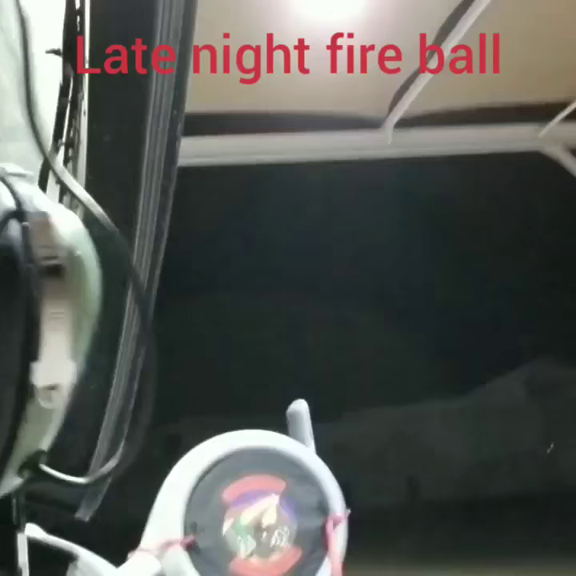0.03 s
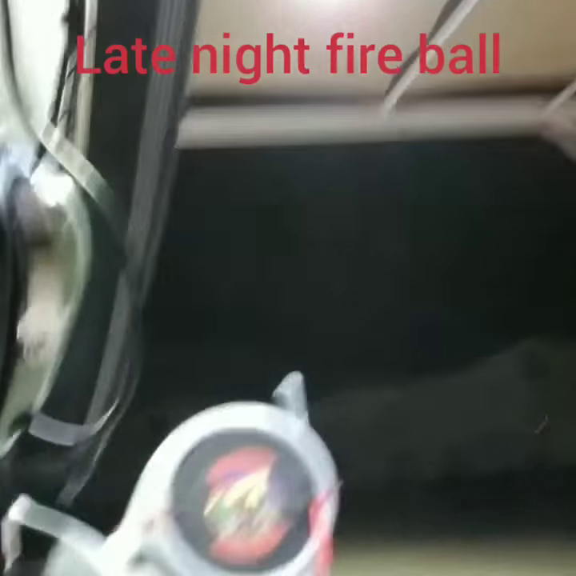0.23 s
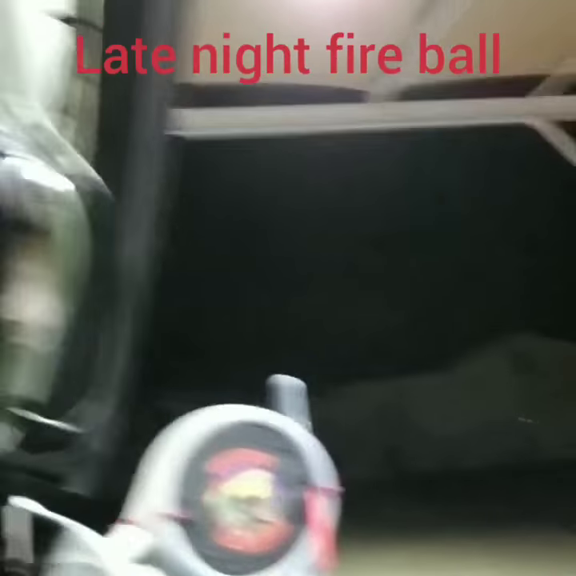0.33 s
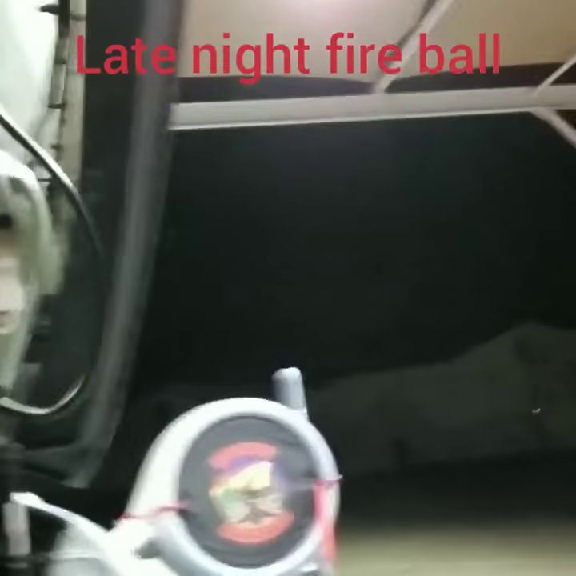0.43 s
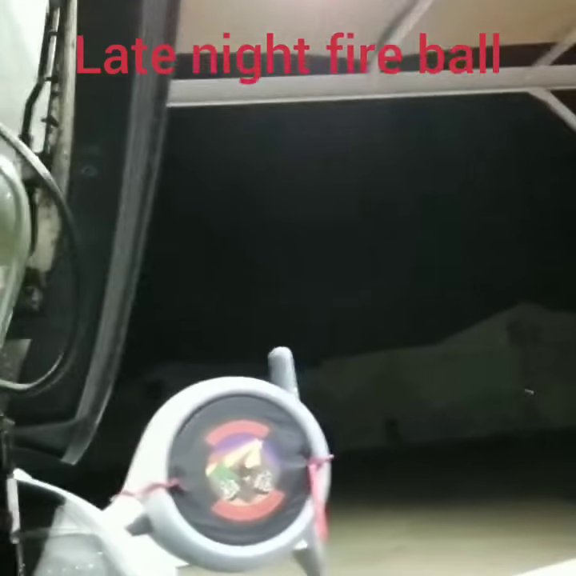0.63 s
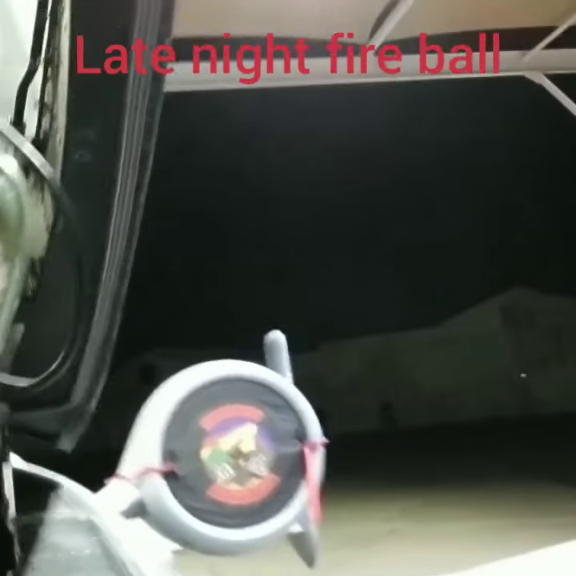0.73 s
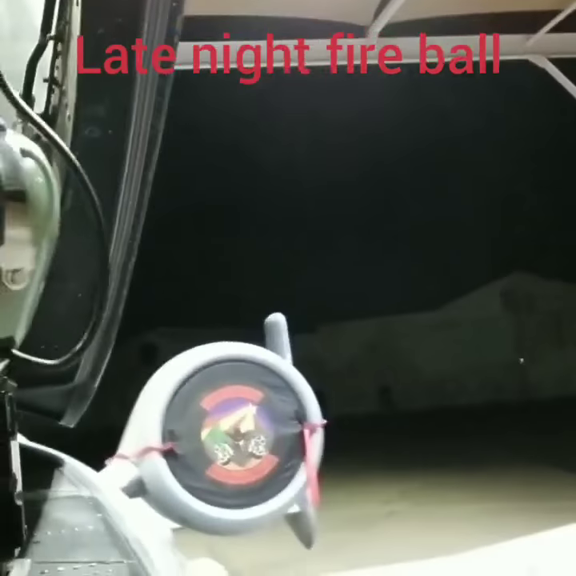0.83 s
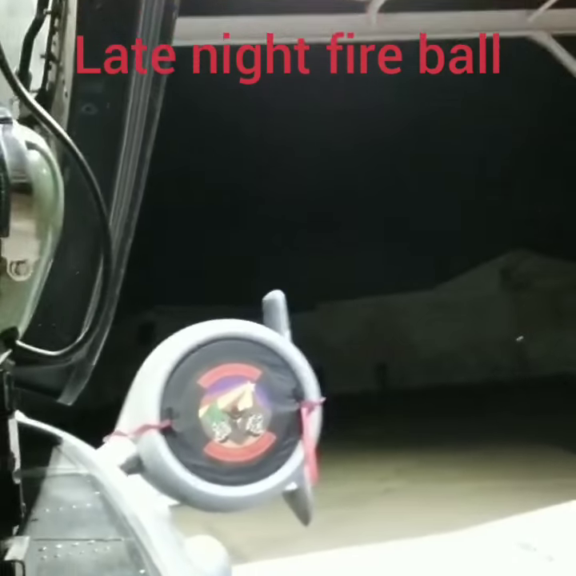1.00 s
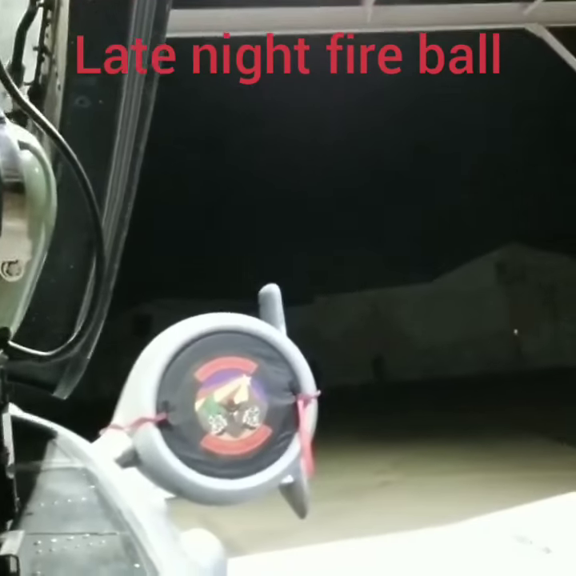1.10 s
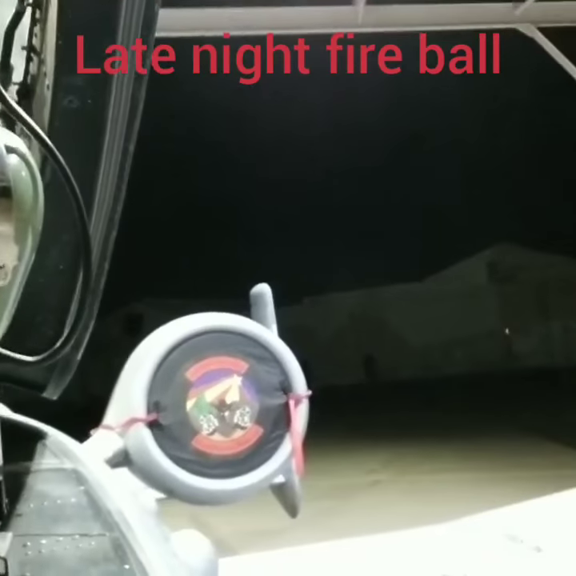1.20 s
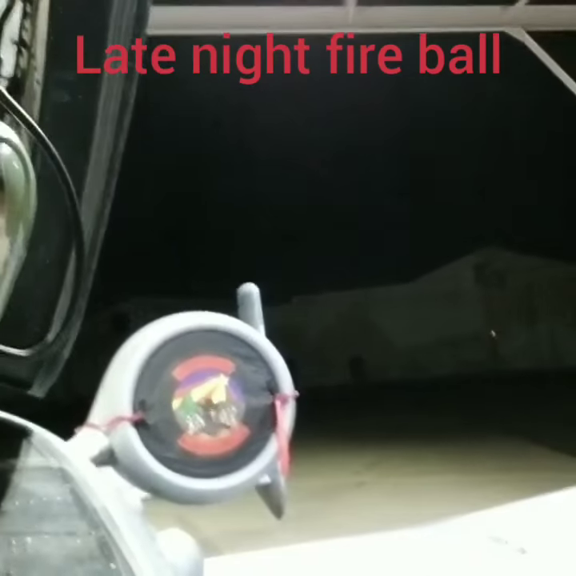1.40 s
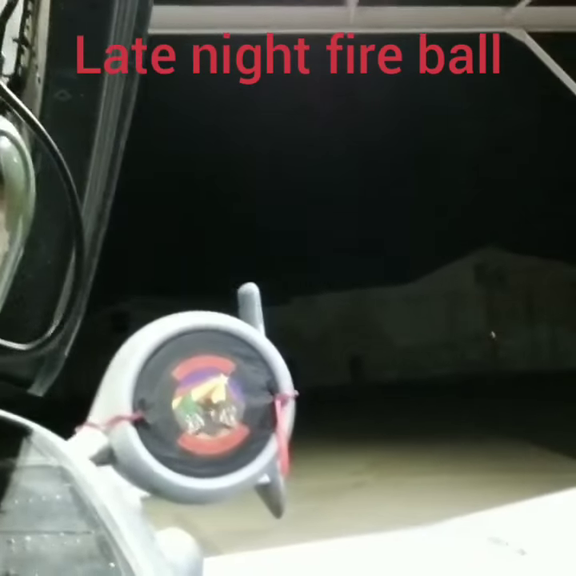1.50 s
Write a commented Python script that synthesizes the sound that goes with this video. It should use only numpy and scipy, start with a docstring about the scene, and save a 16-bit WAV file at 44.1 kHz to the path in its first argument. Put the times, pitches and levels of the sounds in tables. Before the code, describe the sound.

An aircraft power unit roars with a throbbing drone and climbing whistles, then abruptly drops.

```python
"""Auxiliary power unit at night

An aircraft's auxiliary power unit, heard from the cockpit almost wholly in the right ear.
Its shaft and gears make a throbbing 203 Hz drone, its turbulent exhaust a roar; both swell in,
hold, then drop abruptly in level. Over them a few chirps lead into a cluster of climbing airy
whistles, with short spurts of hiss on a soft rush of air."""
import sys
import numpy as np
from scipy import signal
from scipy.fft import rfft, irfft
from scipy.io import wavfile
from scipy.ndimage import uniform_filter1d

SR = 44100
rng = np.random.default_rng(int(sys.argv[2]) if len(sys.argv) > 2 else 0)


def master(y):
    """Save y as 16-bit WAV."""
    cut = np.clip(np.atleast_2d(y).T, -1, 1)
    pcm = np.round(cut * 32767)  # scale
    wavfile.write(sys.argv[1], SR, pcm.astype(np.int16))


N = 68355
T = np.arange(N) / SR
START_S, DROP_S, DROP_LENGTH_S = 0.1361, 1.213, 0.007


def amp(db):
    """Decibels to gain."""
    return 10 ** (np.asarray(db) / 20)


def unit(x):
    """Scales to an rms of one."""
    return x / np.sqrt(np.mean(abs(x) ** 2) + 1e-20)


def curve(points):
    """An envelope of straight lines through (time_s, value) points."""
    return np.interp(T, *np.transpose(points))


def lowpass(x, cutoff_hz):
    """Rolls off everything above the cutoff."""
    hz = np.fft.rfftfreq(N, 1 / SR)
    return irfft(rfft(x) / (1 + (hz / cutoff_hz) ** 4), N)


def wander(rate_hz):
    """Smooth random motion up to about the given rate."""
    return unit(lowpass(rng.standard_normal(N), rate_hz))


def noise(spectrum, patch_db):
    """Noise of a given colour, with random louder and softer patches in time and frequency."""
    _, _, cells = signal.stft(rng.standard_normal(N), SR, nperseg=1024, noverlap=768)
    patches = uniform_filter1d(rng.standard_normal(cells.shape), size=9, axis=0)
    patches = unit(uniform_filter1d(patches, size=7, axis=1))
    mottled = signal.istft(cells * amp(patch_db * patches), nperseg=1024, noverlap=768)[1][:N]
    hz, db = np.transpose(spectrum)
    colour = amp(np.interp(np.log(np.fft.rfftfreq(N, 1 / SR) + 1), np.log(hz), db))
    return unit(irfft(rfft(mottled) * colour, N))


def running(drop_db=0):
    """The machine's envelope: sudden start, swell, hold and an optional abrupt drop."""
    # swell and hold: time_s, gain_db
    swell = [(.137, -22), (.18, -13.5), (.24, -7.5), (.32, -4.5), (.44, -1), (.6, 0), (.85, -0.5),
             (1.03, -1.5), (1.2, -1.5)]
    attack = np.clip((T - START_S) / 0.0035, 0, 1)
    drop = np.clip((T - DROP_S) / DROP_LENGTH_S, 0, 1)
    return attack * amp(curve(swell) + drop_db * drop)


def machine_tone(cycles, level_db, throb_depth, flutter_depth):
    """The tone of one rotating part, with a regular throb and a random flutter."""
    throb_hz, throb_peak_s, flutter_hz = 10.16, 0.544, 25
    throb = 1 + throb_depth * np.cos(2 * np.pi * throb_hz * (T - throb_peak_s) + 0.5 * wander(1))
    flutter = 1 + flutter_depth * (wander(flutter_hz) + 1j * wander(flutter_hz)) / np.sqrt(2)
    return amp(level_db) * unit((throb * flutter * np.exp(2j * np.pi * cycles)).real)


def drone():
    """Shaft harmonics and the tones of other rotating parts, all riding one nearly steady speed."""
    # shaft harmonics: multiple, level_db, throb_depth, flutter_depth
    orders = [(1, -11, 0.01, 0.06), (2, -19.5, 0, 0.1), (4, -34.5, 0.34, 0), (8, -31.5, 0, 0.21),
              (10, -51, 0, 0.1), (12, -44, 0, 0), (16, -37.5, 0, 0.03), (20, -44.5, 0.2, 0.34),
              (24, -45.5, 0.5, 0.2)]
    # wavering tones of the other parts: pitch_hz, level_db, throb_depth, flutter_depth
    side_tones = [(97.1, -32.5, .1, 0.52), (130.3, -30.5, 0, 0.23), (300.3, -23, 0.24, 0.72),
                  (389.2, -27, 0.06, 0.83), (517.6, -33.5, 0, 0.23), (614.3, -24, 0.55, 0.37),
                  (693, -33, 0.14, 0.6), (909, -33.5, 0.09, 0.56), (1044, -32, 0, 1),
                  (1106.7, -29.5, 1, 0.38), (1324, -54, 0, .8), (1405, -45, 0.2, 0.4)]
    shaft_hz, speed_drift = 202.6, 0.000718
    clock = np.cumsum(1 + speed_drift * wander(2.8)) / SR
    shaft = sum(machine_tone(multiple * shaft_hz * clock, *voice) for multiple, *voice in orders)
    return shaft + sum(machine_tone(hz * clock + rng.random(), *voice) for hz, *voice in side_tones)


def exhaust_roar():
    """Turbulent exhaust noise with a fast flicker; its bass builds up last."""
    # colour of the exhaust: frequency_hz, relative_db
    spectrum = [(20, -36), (33, -31), (45, -9.5), (85, -3), (160, -0.5), (250, 2.5), (350, -7), (480, -3),
                (700, -4), (870, -12), (1150, -8), (1600, -14.5), (2300, -15.5), (3200, -18.5), (5200, -21),
                (7000, -27), (8200, -31.5), (9800, -38.5), (12000, -39.5), (14500, -40), (15700, -43)]
    level_db, flicker_db, bass_start_db, bass_full_s = -20, 0.5, -9, 0.45
    roar = noise(spectrum, patch_db=1.5)
    bass = lowpass(roar, cutoff_hz=130)
    bass_lag = np.clip((bass_full_s - T) / (bass_full_s - START_S), 0, 1) ** 0.5
    roar = roar - bass + bass * amp(bass_start_db * bass_lag)
    return roar * amp(level_db + flicker_db * wander(82))


def left_ear_noise():
    """A faint bed of noise, strongest in the low mids."""
    # colour of the bed: frequency_hz, relative_db
    spectrum = [(30, -8), (100, 1), (220, 9.5), (700, 0), (2000, -2), (4000, -5.5), (6000, -12.5),
                (8300, -28), (10000, -18), (12500, -10.5), (15300, -12)]
    return noise(spectrum, patch_db=2) * amp(-51.5)


def air_rush():
    """A soft rush of air, faint at first, that swells under the whistles."""
    # colour of the rush: frequency_hz, relative_db
    spectrum = [(800, -18), (2400, 2), (3500, 2), (4500, -4), (6300, 6), (8000, -1), (9400, -16),
                (10500, -29), (12700, -17), (15700, -23)]
    # its swell, dip and return: time_s, level_db
    envelope = [(1.0, -45), (1.22, -35), (1.31, -34), (1.328, -43), (1.42, -56), (1.48, -41), (1.55, -45)]
    return noise(spectrum, patch_db=3) * amp(curve(envelope))


def whistle(pitch_hz, width_hz):
    """A narrow band of air noise that follows a pitch."""
    carrier = np.exp(2j * np.pi * np.cumsum(pitch_hz * np.ones(N)) / SR)
    breath = wander(width_hz / 2) + 1j * wander(width_hz / 2)
    return unit((breath * carrier).real)


def chirps():
    """Brief whistles at steady pitches, ahead of the climb."""
    # bell-shaped blips: peak_s, length_s, pitch_hz, level_db
    blips = [(.715, .08, 3790, -37), (.825, .048, 4330, -30), (.85, .08, 4900, -40),
             (.935, .07, 4220, -36.5)]
    return sum(whistle(hz, width_hz=150) * amp(db) * np.exp(-(2 * (T - peak_s) / length_s) ** 2)
               for peak_s, length_s, hz, db in blips)


def lead_whistle():
    """The main whistle: an unsteady tone that climbs, flares and fades."""
    # path of the whistle: time_s, pitch_hz, level_db
    path = [(.9, 2400, -51), (.98, 2490, -30.5), (1.053, 2614, -27), (1.08, 2672, -29.5),
            (1.113, 2750, -17), (1.15, 2748, -25.5), (1.18, 2765, -26), (1.221, 2830, -28),
            (1.301, 3050, -59)]
    trim_db, jitter_hz, flutter_depth, flutter_hz = -1.5, 39.3, 0.46, 99
    times, hz, db = np.transpose(path)
    pitch = np.interp(T, times, hz) + jitter_hz * wander(flutter_hz)
    tone = np.sin(2 * np.pi * np.cumsum(pitch) / SR)
    flutter = 1 + flutter_depth * wander(flutter_hz)
    return unit(tone * flutter) * amp(trim_db + np.interp(T, times, db, left=-np.inf, right=-np.inf))


def climbing_whistles():
    """Fainter airy whistles that glide up together, each swelling and fading in turn."""
    # glides: peak_s, pitch_at_peak_hz, climb_hz_per_s, width_hz, level_db, rise_db_per_s, fall_db_per_s
    glides = [(1.2, 3380, 2000, 170, -32, 80, 110), (1.31, 3100, 1100, 190, -35, 90, 130),
              (1.46, 3830, 1900, 150, -49, 40, 60), (1.19, 5000, 2800, 300, -35, 70, 90),
              (1.125, 5430, 2500, 180, -29, 130, 100), (1.23, 5820, 4000, 300, -31, 200, 125),
              (1.19, 8600, 5000, 700, -42, 85, 90), (1.36, 9350, 300, 450, -50, 220, 120),
              (1.19, 11400, 6000, 900, -51, 60, 130), (1.2, 14250, 5000, 750, -45, 130, 220)]
    cluster = np.zeros(N)
    for peak_s, hz, climb, width_hz, db, rise, fall in glides:
        from_peak_s = T - peak_s
        fade_db = np.maximum(-rise * from_peak_s, fall * from_peak_s)
        cluster += whistle(hz + climb * from_peak_s, width_hz) * amp(db - fade_db)
    return cluster


def hiss_spurts():
    """Short spurts of bright hiss, the first as the drone drops."""
    # colour of the hiss: frequency_hz, relative_db
    spectrum = [(1000, -16), (3300, -1), (4500, -5), (6000, 0), (8500, 5.5), (10500, -6), (12500, 4.5),
                (14800, 2.5), (15700, -6)]
    # shape of the spurts: time_s, level_db
    envelope = [(1.1, -66), (1.218, -44), (1.234, -32.5), (1.26, -32), (1.274, -41), (1.298, -35),
                (1.322, -41.5), (1.4, -52.5), (1.49, -82), (1.52, -43.5), (1.55, -35.5)]
    return noise(spectrum, patch_db=3.5) * amp(curve(envelope))


def scene():
    """The machine sits hard right; the left ear gets a trace of it and faint noise."""
    machine = (drone() + exhaust_roar()) * running(drop_db=-18)
    bed = left_ear_noise() * running(drop_db=-27)
    air = air_rush() + chirps() + lead_whistle() + climbing_whistles() + hiss_spurts()
    right = machine + air * running()
    left = bed + amp(-43.5) * right
    return np.array([left, right])


def record(dry):
    """Soft-clips the highest peaks and cuts the extreme treble."""
    knee, ceiling, cutoff_hz = 0.7, 0.93, 15780
    body = np.clip(dry, -knee, knee)
    rounded = body + (ceiling - knee) * np.tanh((dry - body) / (ceiling - knee))
    high_cut = signal.firwin(511, cutoff_hz, window=("kaiser", 9), fs=SR)
    return signal.oaconvolve(rounded, high_cut[None], "same")


dry = scene()
out = record(dry)
master(out)
```